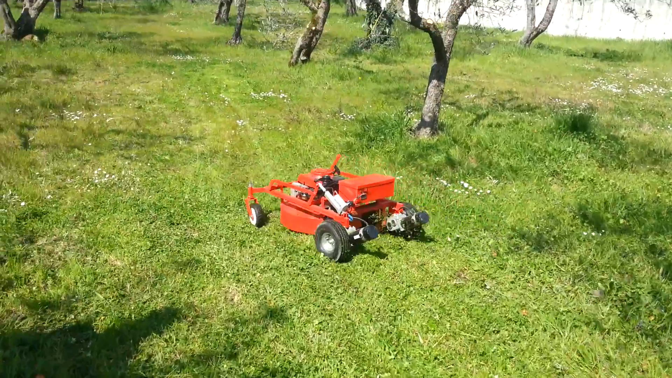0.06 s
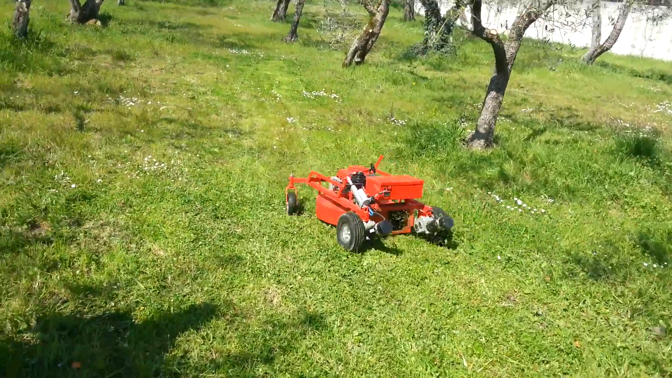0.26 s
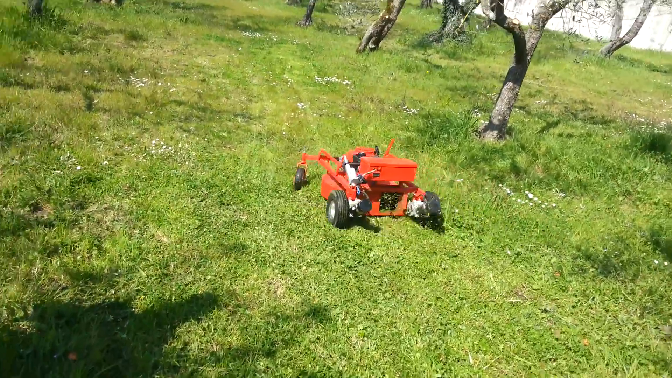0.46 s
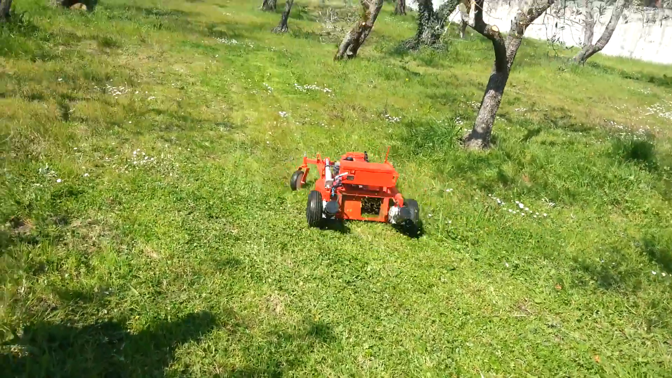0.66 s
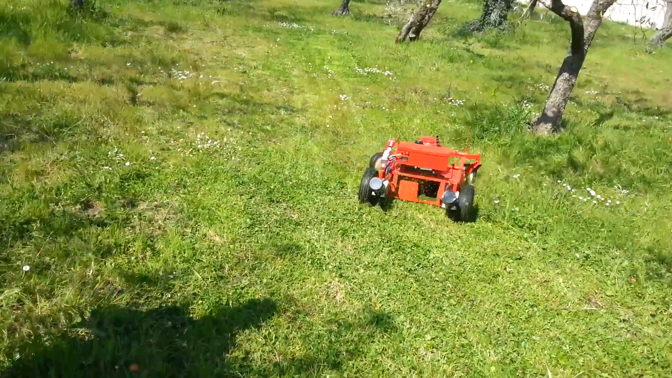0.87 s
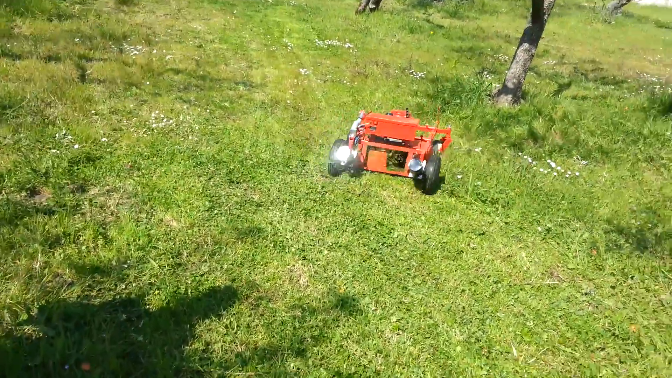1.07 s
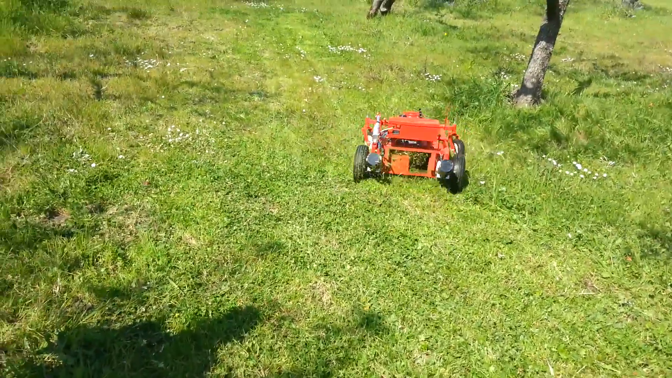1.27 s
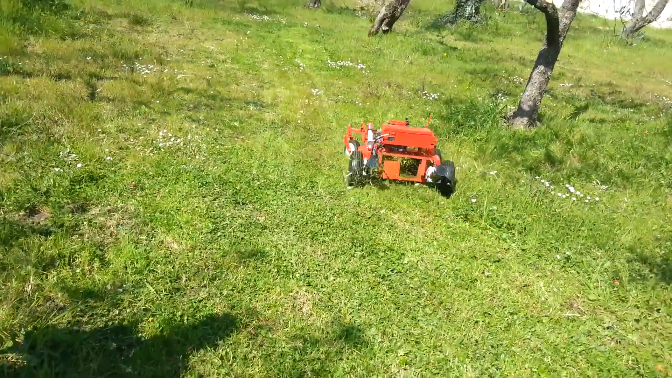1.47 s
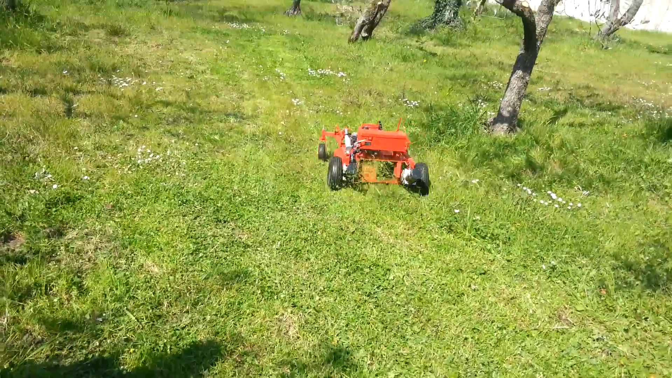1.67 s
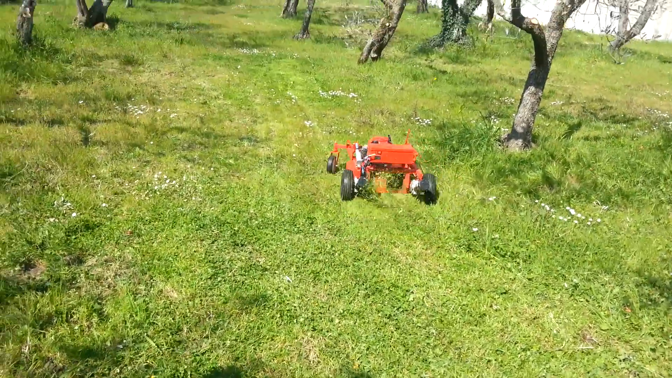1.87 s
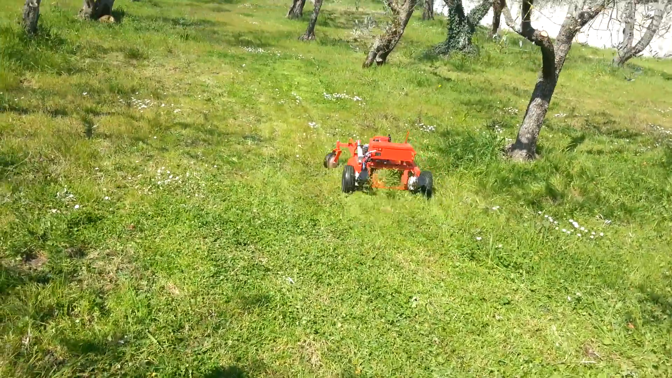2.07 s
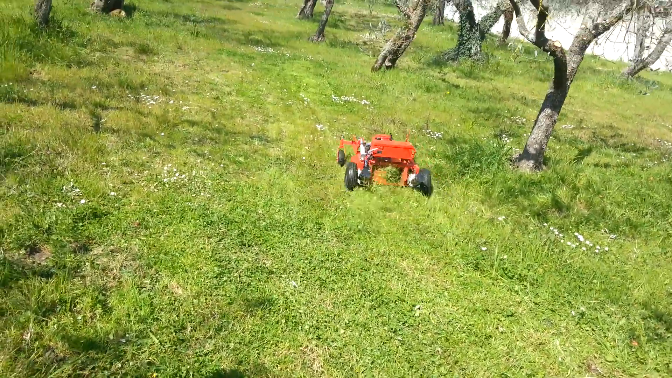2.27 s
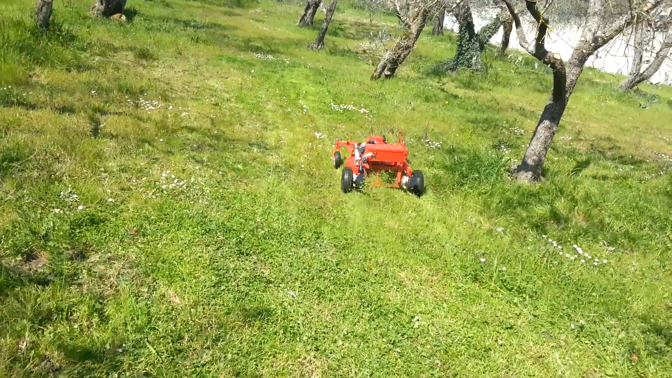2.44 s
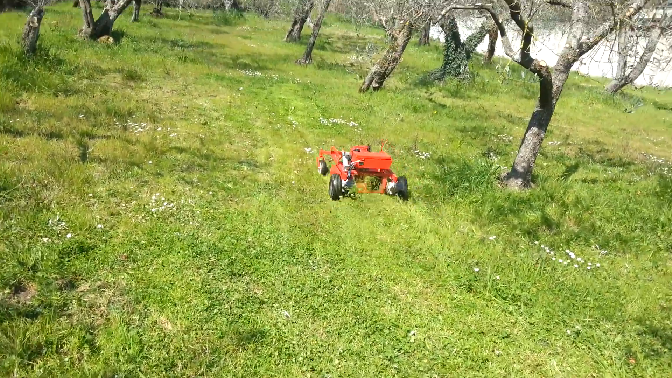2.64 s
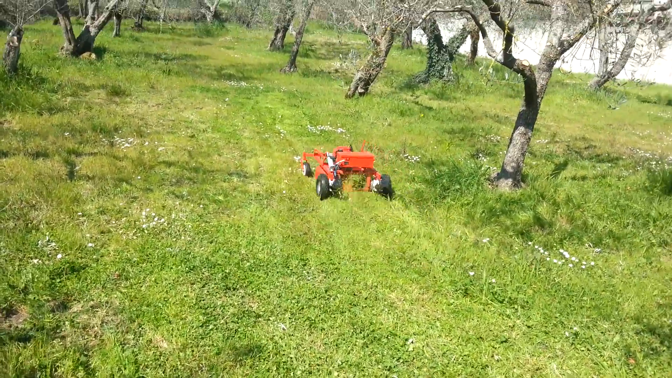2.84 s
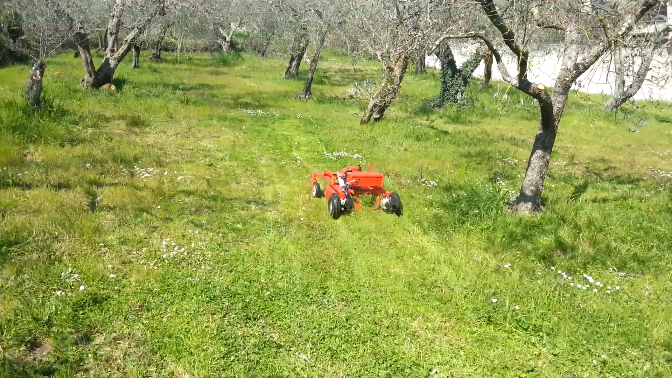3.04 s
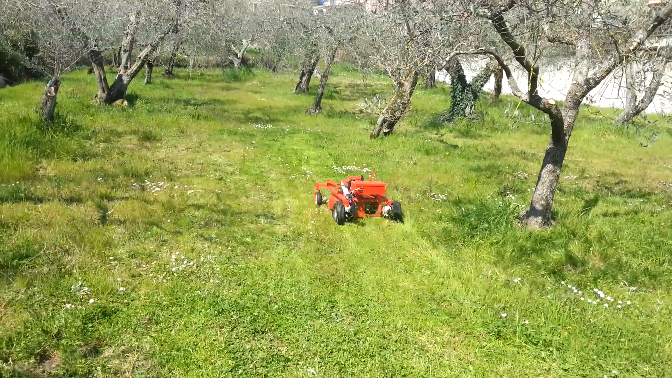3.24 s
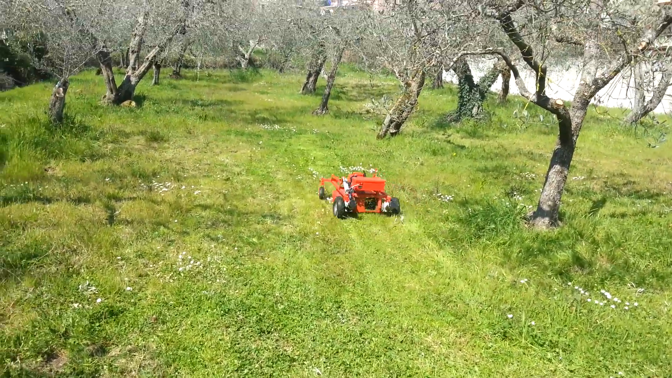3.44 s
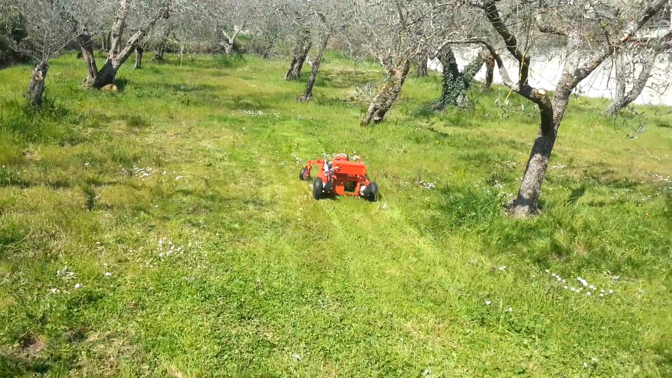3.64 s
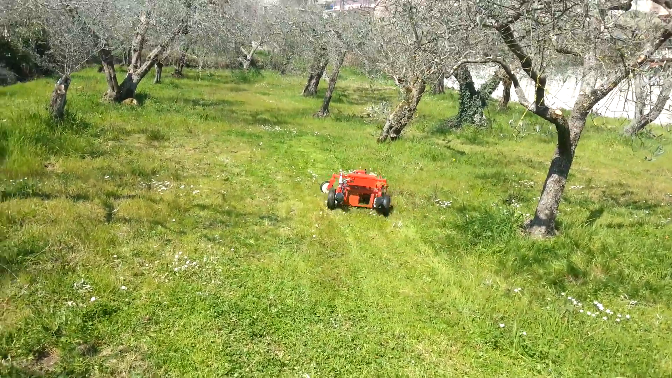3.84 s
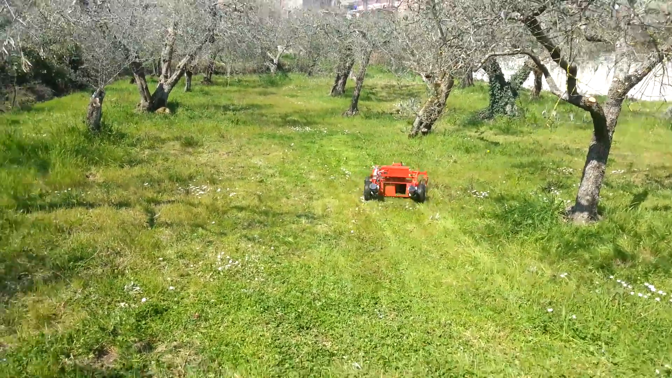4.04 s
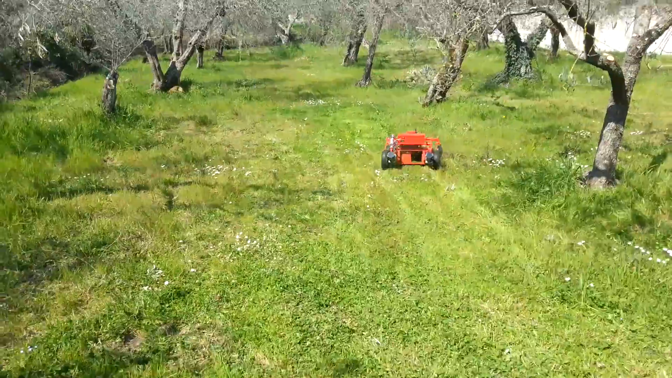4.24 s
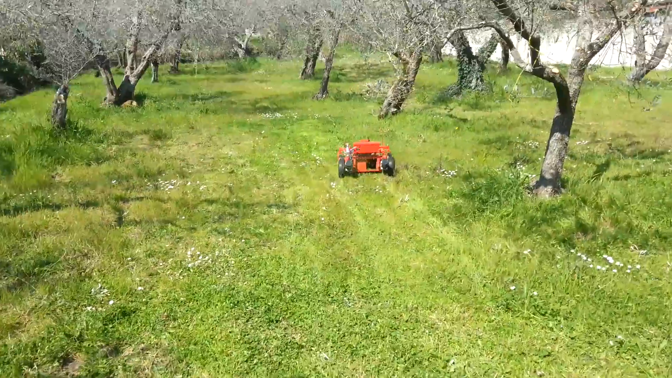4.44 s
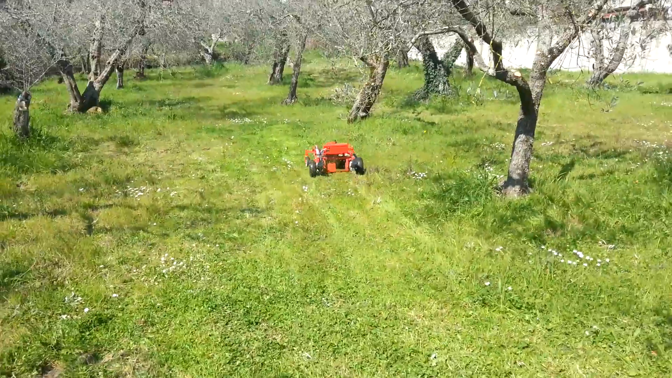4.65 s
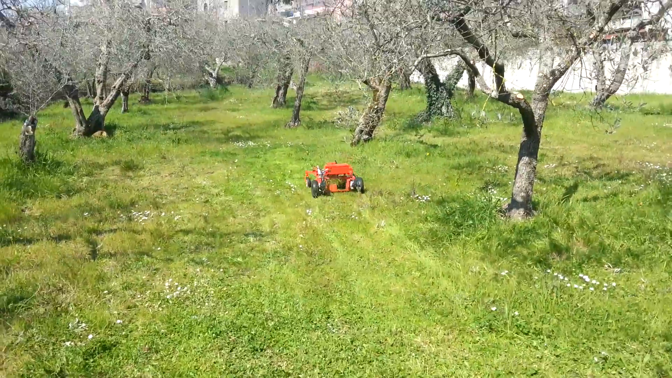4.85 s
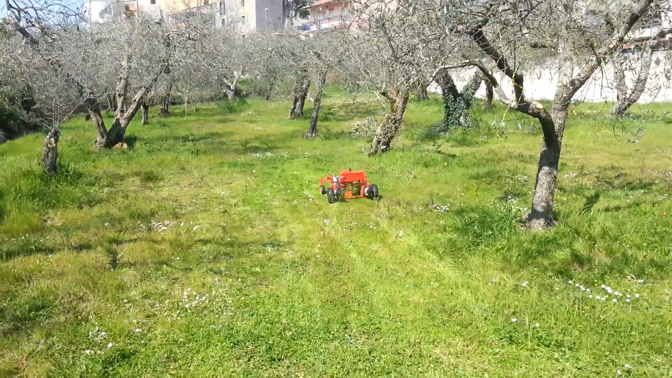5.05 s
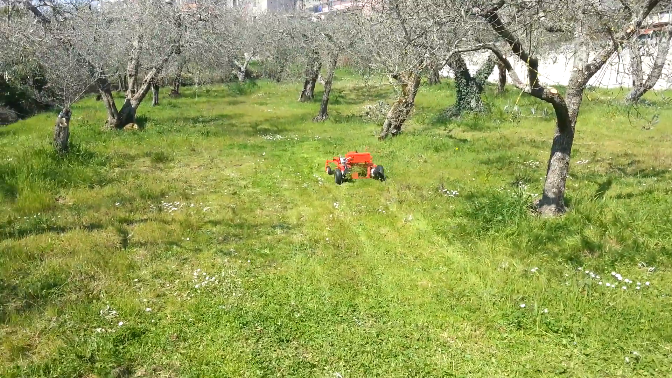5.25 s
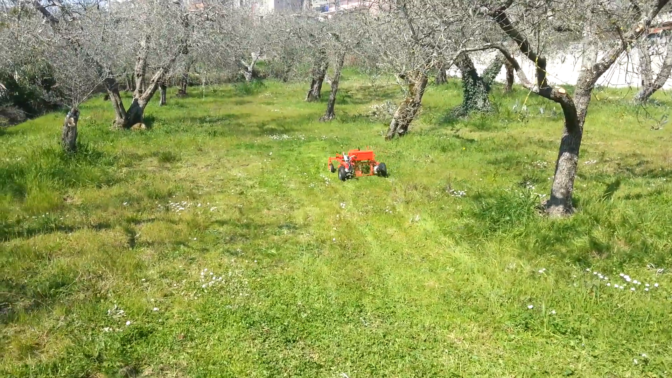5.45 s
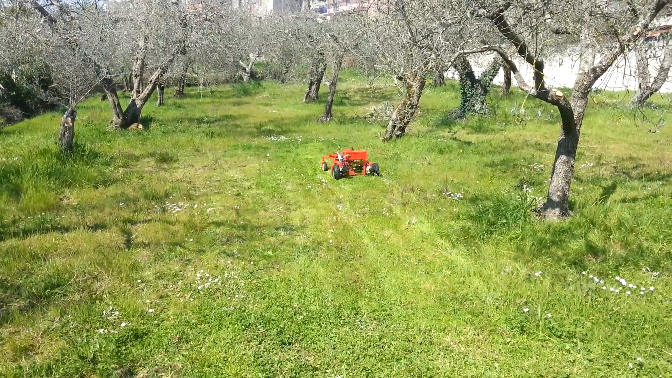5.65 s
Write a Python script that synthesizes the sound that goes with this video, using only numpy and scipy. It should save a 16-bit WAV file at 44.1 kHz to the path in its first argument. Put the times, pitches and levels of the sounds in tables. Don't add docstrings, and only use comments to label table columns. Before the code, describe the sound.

Outdoors, a remote-driven mower starts close, droning and clattering, its blades chopping thick stems with loud snaps and hollow clunks under the deck. It moves away and becomes quieter and smoother, with a faint metallic whine around two seconds. After four seconds the right side opens up brighter as a hand slides off the microphone; dry crackles and another burst of cutting follow. A light breeze is barely audible.

```python
import sys
import numpy as np
from scipy import signal
from scipy.fft import rfft, irfft, next_fast_len
from scipy.io import wavfile
from scipy.ndimage import uniform_filter1d, map_coordinates

SR = 44100
rng = np.random.default_rng(int(sys.argv[2]) if len(sys.argv) > 2 else 0)


def nominal_scale(level):
    x = np.asarray(level, float) / 20
    return 10 ** x


def file_out(sig):
    cols = np.atleast_2d(sig).T
    lim = np.clip(cols, -1, 1)
    pcm = np.round(lim * 32767).astype(np.int16)
    wavfile.write(sys.argv[1], SR, pcm)


N = 251799
T = np.arange(N) / SR

# time in s, ground echo delay in ms, echo strength 0-1, right port lag in ms.
PATH = [(0, 1.13, .35, 0), (.7, 1.13, .35, 0), (.85, 1.15, .3, .03), (1.4, 1.21, .3, .03),
        (1.55, 1.22, .4, -.01), (2.3, 1.25, .5, -.01), (2.8, 1.4, .55, 0), (3.6, 1.43, .55, 0),
        (4.0, 1.37, .5, .01), (4.2, 1.34, .4, .03), (4.45, 1.27, .25, 0), (5.71, 1.23, .3, 0)]


def evened(x):
    return x / np.sqrt(np.mean(x ** 2) + 1e-20)


def read(points, hz):
    f, value = np.transpose(points)
    return np.interp(np.log(hz + 1), np.log(f + 1), value)


def columns(rows, t):
    s, *values = np.transpose(rows)
    return [np.interp(t, s, v) for v in values]


def colour(x, points):
    size = next_fast_len(N)
    gain = nominal_scale(read(points, np.fft.rfftfreq(size, 1 / SR)))
    return evened(irfft(rfft(x, size) * gain, size)[..., :N])


def drift(hz):
    return colour(rng.standard_normal(N), [(hz, 0), (3 * hz, -30), (30 * hz, -120)])


def ring(x, hz, width_hz):
    return signal.lfilter(*signal.iirpeak(hz, hz / width_hz, SR), x)


def ring_twice(x, hz, width_hz, second_width_hz):
    return ring(ring(x, hz, width_hz), hz, second_width_hz)


def beat(cycle, depth, count, shift):
    return 1 + depth * np.cos(2 * np.pi * (count * cycle - shift))


def held_gain(start_s, length_s, attack_s, release_s):
    rise = np.clip((T - start_s) / attack_s, 0, 1)
    return rise * np.exp(-np.maximum(T - start_s - length_s, 0) / release_s)


def two_paths():
    return rng.standard_normal((2, N))


def grains(spread_db, per_s):
    size = nominal_scale(spread_db * np.minimum(rng.exponential(1, N), 4))
    return size * (rng.random(N) < per_s / SR) * two_paths()


def place(out, start_s, peak_db, sound):
    at = round(start_s * SR)
    out[:, at:at + sound.shape[1]] += nominal_scale(peak_db) * sound / abs(sound).max()


def wind():
    gusts = nominal_scale(3.5 * np.array([drift(hz=5), drift(hz=5)]))
    rumble = colour(two_paths(), [(12, -20), (30, -10), (60, -2), (110, 10), (300, -50)])
    return nominal_scale(-59.5) * gusts * rumble


def chaff():
    # start in s, peak in dB.
    husks = [(4.5718, -41), (4.6003, -31), (4.6123, -35), (4.6497, -36), (4.6606, -33), (4.6726, -30),
             (4.6871, -30), (4.712, -37), (4.7634, -34), (4.7739, -31), (4.8133, -41), (4.8133, -31),
             (4.8263, -27), (4.8642, -28), (4.8757, -30), (4.8901, -28), (4.9166, -28), (4.9879, -29),
             (4.9879, -29), (5.0049, -29), (5.0178, -25), (5.0303, -22), (5.0672, -26), (5.0807, -25)]
    out, t = np.zeros((2, N + 512)), np.arange(512) / SR
    for s, db in husks:
        snap = rng.standard_normal((2, 512)) * nominal_scale(-60 * t / .016)
        place(out, s, db + 4.5, ring_twice(snap, 13600., 3500., 3600.))
    return out[:, :N]


def ticks():
    # start in s, peak in dB.
    clicks = [(0.0423, -19), (0.0977, -24), (0.136, -7), (0.162, -12), (0.5232, -15), (0.617, -26),
              (0.827, -18), (0.8869, -28), (0.9183, -22), (0.9717, -13), (1.2535, -23), (1.2544, -22),
              (1.3977, -17), (1.5424, -24), (1.569, -15), (1.584, -14), (1.6606, -22), (1.714, -23),
              (1.7399, -22), (1.8422, -19), (1.9589, -25), (2.4249, -17), (2.6224, -26), (2.9617, -27),
              (3.0898, -36), (3.2445, -31), (3.3308, -36), (3.4685, -30), (3.6641, -30), (4.147, -26),
              (4.1734, -23), (4.19, -26), (4.2842, -32), (4.2911, -30), (4.3345, -36), (4.3859, -26),
              (4.4618, -37), (4.5151, -35), (4.5341, -33), (4.601, -30), (4.6122, -31), (4.6618, -31),
              (4.774, -21), (4.8628, -29), (4.9881, -24), (5.018, -19), (5.0305, -26), (5.0674, -25),
              (5.0933, -29), (5.1602, -27), (5.2824, -31), (5.3333, -24), (5.3592, -30), (5.5228, -34),
              (5.5822, -32), (5.6226, -32), (5.6875, -29)]
    out, t = np.zeros((2, N + 512)), np.arange(512) / SR
    for s, db in clicks:
        click = rng.standard_normal((2, 512)) * nominal_scale(-60 * t / .009)
        place(out, s, db + 2.5, ring(click, 12000., 9000.))
    return out[:, :N]


def panel():
    # time in s, level in dB.
    level = [
        (0, -52),
        (1.6, -46),
        (1.85, -42),
        (2.2, -37),
        (2.33, -48),
        (2.44, -41),
        (2.63, -39),
        (2.9, -42),
        (4.4, -50),
        (5.71, -55),
    ]
    tone = ring(ring(two_paths(), 1560., 30.), 1559., 32.)
    return nominal_scale(columns(level, T)[0]) * evened(tone)


def booms(cycle):
    # start in s, length in s, level in dB, pitch in Hz.
    clumps = [(0.2, 0.19, -27, 530), (0.53, 0.12, -26, 570), (0.614, 0.091, -33, 616),
              (0.924, 0.093, -24, 644), (0.976, 0.083, -26, 570), (1.344, 0.07, -27, 570),
              (1.49, 0.088, -28, 583), (1.5, .05, -33, 640), (1.824, 0.049, -34.5, 580),
              (2.42, 0.11, -41, 690), (1.9, 0.046, -41, 620), (0.044, 0.095, -25, 1170),
              (0.46, 0.08, -27, 1170), (0.032, 0.514, -28.5, 320), (5.073, 0.15, -39.5, 4600),
              (5.22, 0.22, -43.5, 4440), (1.327, 0.094, -30, 2730), (1.524, 0.051, -23, 2600),
              (1.38, .05, -32, 3200), (4.32, 0.16, -38.5, 3030), (2.72, .2, -40.5, 700),
              (1.72, .2, -33, 400), (5, .45, -50, 13500), (5.0, .2, -44, 5900), (5.2, 0.1, -48, 7200),
              (4.5, .08, -41, 7400), (6.4, 0.4, -43, 16000), (1.85, .88, -40.5, 1580),
              (2.95, .08, -46, 5500), (3.62, .06, -45, 5700), (2.6, .05, -44, 5900), (3.96, .05, -46, 5600),
              (0.916, 0.11, -30.5, 753), (5.0, 0.18, -38, 1290), (5.02, .18, -38, 1760),
              (1.01, 0.13, -39, 960), (2.1, .63, -34, 2350), (0.52, 0.25, -30, 1950),
              (0.022, 0.29, -30.5, 1670), (5.8, 0.18, -33, 1910), (5.07, 0.14, -36, 2310)]
    fade_s = 0.024
    out = np.zeros((2, N))
    tumble = two_paths() * beat(cycle, .3, count=4, shift=.3) * nominal_scale(1.2 * drift(hz=30.))
    for start_s, length_s, db, hz in clumps:
        held = held_gain(start_s, length_s, fade_s, fade_s)
        held = uniform_filter1d(held, round(min(.4 * length_s, .05) * SR))
        width_hz = 0.11 * hz * (1 + hz / 2500)
        out += nominal_scale(db) * held * evened(ring_twice(tumble, hz, width_hz, width_hz))
    return out


def strikes():
    # start in s, peak in dB, pitch in Hz.
    stems = [(0.0435, -9, 1590), (0.082, -13, 1750), (0.1337, -6, 2620), (0.146, -13, 2300),
             (0.157, -13, 2600), (0.249, -17, 2130), (0.454, -16, 2500), (0.566, -19, 1780),
             (0.6, -16, 1950), (0.887, -19, 2050), (0.974, -14, 2410), (0.9995, -24, 2430),
             (1.04, -16, 2710), (1.243, -7, 2680), (1.255, -3, 2470), (1.2796, -11, 2640),
             (1.301, -20, 2550), (1.5435, -3.5, 1810), (1.557, -13, 2400), (1.572, -13, 2600),
             (1.5842, -7, 2597), (1.844, -16, 1560), (2.146, -22, 2280), (2.2365, -22, 2250),
             (2.416, -19, 2220), (2.626, -16, 1580), (2.7021, -16, 2034), (4.993, -18, 3150),
             (5.0311, -12.5, 2260), (5.082, -21, 2080), (5.093, -12, 2280), (5.118, -14.5, 4280),
             (5.127, -19, 4400), (5.207, -17, 2300), (5.245, -24, 4500), (5.2826, -31, 2080),
             (5.309, -25, 4400), (5.333, -26, 4510), (5.3473, -22, 4830), (5.3602, -12, 4550),
             (5.436, -26, 2170), (5.521, -25, 2230), (5.6233, -23, 4470), (5.699, -14, 3000)]
    out, t = np.zeros((2, N + 1024)), np.arange(1024) / SR
    envelope = np.minimum(t / .0005, 1) * nominal_scale(-60 * t / .011)
    for s, db, hz in stems:
        burst = rng.standard_normal((2, 1024)) * envelope
        crack = ring_twice(burst, 5000., 6000., 7000.)
        deck_ring = ring_twice(burst, hz, 1700., 1700.)
        place(out, s, db + 1.5, crack + 5.5 * deck_ring)
    return out[:, :N]


def tufts():
    # start in s, length in s, shredding rise in dB, deck jolt in dB.
    caught = [(.0, 0.035, -2, 2.5), (0.095, 0.062, 3, 1), (0.244, 0.14, 0, 1), (0.47, 0.051, 2, 2.5),
              (0.575, 0.12, 2.5, 2), (0.882, 0.039, 6.5, 5.5), (0.962, 0.12, 1, 5),
              (1.242, 0.012, 10, -1.5), (1.346, 0.08, 5.5, 2), (1.495, 0.049, 2, 5), (1.538, 0.064, 7.5, 4),
              (1.614, 0.053, 4, 2), (1.726, 0.058, 3.5, 4.5), (1.832, 0.036, 6.5, 5.5),
              (1.953, 0.1, 3.5, 2.5), (2.145, 0.11, 5, 3.5), (2.42, 0.083, 6, 5.5), (2.616, 0.12, 5.5, 3.5),
              (2.845, 0.051, 3, -3), (3.15, .11, 1, 1.5), (3.437, 0.066, 4.5, 1), (3.786, 0.031, 5, -1),
              (4.166, 0.053, 5, 0), (4.524, 0.027, 4.5, 2), (4.987, 0.092, 4, 5), (5.074, .12, 5.5, 6),
              (5.347, 0.087, 3, 3.5), (5.505, 0.038, 2.5, 2), (5.613, 0.022, 2.5, -1.5),
              (5.677, .05, 3.5, 7)]
    start_s, length_s, *rises_db = np.transpose(caught)[..., None]
    shape = held_gain(start_s, length_s, attack_s=0.003, release_s=0.012)
    return [(db * shape).max(axis=0) for db in rises_db]


def shred(cycle, level_db, loss_db):
    # frequency in Hz, density in dB per Hz.
    spectrum = [(200, -32), (500, -25), (1100, -32), (2500, -20), (3200, -4.5), (5000, -12), (8300, -13.5),
                (12000, -17.5), (15000, -18.5)]
    tip_pass = np.exp(0.5 * (np.cos(2 * np.pi * (4 * cycle - .3)) - 1))
    sweep = 4.4 + tip_pass * nominal_scale(11.5 * np.tanh(drift(hz=24.7)))
    snaps = colour(sweep * grains(spread_db=-3.0, per_s=9000.), spectrum)
    fizz = ring(snaps, 13000., 5000.)
    fizz_gain = nominal_scale(1.8 * drift(hz=8.7) + 0.56 * loss_db + 1.5)
    return nominal_scale(level_db) * (snaps + fizz * (fizz_gain - 1))


def rattle(cycle, level_db):
    # mode in Hz, width in Hz, level in dB.
    casing = [(567, 41, -8), (1121, 115, 11), (1053, 45, 11), (1560, 40, 8), (1636, 154, 7.5),
              (1801, 180, 7.5), (2360, 910, 1.5), (2456, 160, -5), (2640, 100, -3), (3820, 520, 0),
              (4550, 120, -2), (5680, 330, -6.5)]
    push = beat(cycle, 0.6, count=3, shift=0.056) * beat(cycle, 0.09, count=4, shift=0.23)
    knocks = push * grains(spread_db=4.5, per_s=8000.)
    modes = sum(nominal_scale(db) * ring_twice(knocks, hz, width_hz, 0.68 * width_hz) for hz, width_hz, db in casing)
    return nominal_scale(level_db) * evened(modes)


def roar(cycle, level_db):
    # frequency in Hz, density in dB per Hz.
    spectrum = [(40, -41), (120, -23.5), (200, -8.5), (240, -5.5), (320, -1), (430, -3.5), (600, -4),
                (830, -8.5), (1050, -7), (1400, -11.5), (2300, -8.5), (3200, -17.5), (8000, -34.5),
                (15000, -51)]
    firing = beat(cycle, 0.094, count=1, shift=0.35) * beat(cycle, 0.071, count=2, shift=0.33)
    blades = beat(cycle, 0.13, count=4, shift=0.43)
    push = firing * blades * nominal_scale(drift(hz=36.8))
    return nominal_scale(level_db) * colour(push * two_paths(), spectrum)


def exhaust(cycle, level_db):
    # multiple of the firing rate, level in dB.
    orders = [(1, -47), (2, -43), (3, -39), (4, -28), (5, -19), (6, -15), (7, -19), (8, -14), (9, -9),
              (10, -7), (11, -18), (12, 0), (13, -13), (14, -10), (15, -10), (16, -8), (17, -11), (18, -12),
              (19, -15), (20, -14), (21, -18), (22, -18), (23, -20), (24, -13)]
    out = np.zeros(N)
    for k, db in orders:
        lag = .36 - .015 * k if k % 4 == 0 else .14 * k - .33
        sway = .0012 * k * drift(hz=5)
        waver_db = (.7 + .11 * k) * drift(hz=6)
        slope_db = -.5 * max(k - 12, 0) - 6 * max(4 - k, 0)
        out += nominal_scale(db + waver_db + slope_db) * np.cos(2 * np.pi * (k * cycle - lag - sway))
    return nominal_scale(level_db) * evened(out)


def ground_echo(deck):
    delay_ms, strength, _ = columns(PATH, T)
    at = np.arange(N) - delay_ms * SR / 1000
    echo = np.array([map_coordinates(path, [at], order=3) for path in deck])
    echo = signal.sosfilt(signal.butter(1, 3500., fs=SR, output="sos"), echo)
    return (deck + strength * echo) / np.sqrt(1 + strength ** 2)


def mower():
    # time in s, firing rate in Hz.
    speed = [(0.0, 19.56), (0.4, 19.5), (0.99, 19.7), (1.26, 19.66), (1.7, 19.28), (1.99, 19.3),
             (2.23, 19.23), (2.55, 19.31), (2.98, 19.23), (3.48, 19.63), (3.72, 19.69), (4.0, 19.66),
             (4.47, 19.86), (4.72, 19.77), (5.21, 19.39), (5.71, 19.42)]
    # time in s, distance in m, grass height in dB, rattle strength in dB.
    drive = [(0, 4.65, 3, 5.5), (.35, 4.5, 3, 1.5), (.65, 4.95, -3, 0.5), (.82, 5.5, -3.5, -5),
             (1.0, 5.57, 4, 0.5), (1.45, 6.2, 3, -0.5), (2.0, 6.96, 2.5, 0), (2.55, 8.3, 3, 3),
             (2.95, 9.2, 2, 4), (3.3, 9.2, -4, 1), (4.1, 10.7, -2, 1), (4.45, 10.7, -1.5, -3.5),
             (4.7, 12.2, 4.5, -1.5), (4.96, 13.8, 5.5, 0), (5.3, 10.8, 2.5, -4), (5.6, 10.9, 0, -29),
             (5.71, 12.5, 4, -11)]
    distance_m, grass_db, rattle_db = columns(drive, T)
    loss_db = -20 * np.log10(distance_m / 5.0)
    tuft_db, jolt_db = tufts()
    cycle = np.cumsum(columns(speed, T)[0]) / SR

    deck = roar(cycle, -21.5 + loss_db + 0.65 * jolt_db)
    deck = deck + shred(cycle, -31.5 + loss_db + grass_db + tuft_db, loss_db)
    deck = deck + rattle(cycle, -27 + loss_db + rattle_db + 0.73 * jolt_db)
    deck = deck + strikes() + booms(cycle) + panel()
    heard = ground_echo(deck) + exhaust(cycle, -27.5 + loss_db + 0.51 * jolt_db)

    turned_s = 2.0
    chute_share = .72 * np.clip(2 - 2 * T / turned_s, 0, 1)
    return heard - chute_share * ring(heard, 425, 95)


def ports(x):
    # time in s, right port uncovered 0-1, notch from the gap under the hand in Hz.
    hand = [
        (0, 0, 15500),
        (4.23, .1, 15500),
        (4.33, .52, 15400),
        (4.4, .62, 15000),
        (4.47, .69, 13000),
        (4.6, .82, 11800),
        (4.85, 1, 11200),
        (5.05, 1, 10700),
        (5.71, 1, 10300),
    ]
    # frequency in Hz, level in dB.
    tilt_on, tilt_off = [(100, 1.1), (700, 0.5), (1300, 5), (2100, 9), (3300, 3), (4500, -1), (6500, -1),
                         (10500, 0), (14000, 4)], [(100, 2.5), (700, -0.5), (1300, -2.5), (2100, 1), (3300, -5.5),
                                          (4500, -6.5), (6500, -9), (10500, -5.5), (14000, -5)]
    # frequency in Hz, lag in rad.
    lead_on, lead_off = [(200, 0), (1500, .45), (2600, -.5), (3500, -1.3), (4300, -5.9), (5500, -5.2),
                         (8000, -6)], [(200, 0), (1500, .3), (2300, -1), (3500, -1.5), (4300, -5.8),
                                          (6500, -5.8), (8000, -8)]
    # frequency in Hz, share 0-1.
    same_on, same_off = [(60, .92), (150, .985), (300, .955), (500, .95), (1300, .88), (2500, .85),
                         (3300, .65), (3900, .3), (4600, .55), (6500, .5), (9000, .3)], [(60, .92), (150, .985), (300, .96), (500, .96), (1300, .9),
                                          (2500, .85), (3600, .7), (6500, .65), (9000, .4)]

    hz, t, (left, other) = signal.stft(x, SR, nperseg=512, noverlap=384)
    rows_hz = hz[:, None]

    def bump(centre_hz, width_hz):
        return np.exp(-((rows_hz - centre_hz) / width_hz) ** 2)

    bare, notch_hz = columns(hand, t)
    cupped = 4 * bare * (1 - bare)
    off = np.clip(8 * bare - 7 * np.clip(rows_hz / 7000, 0, 1), 0, 1)

    def blend(on, free):
        return read(on, hz)[:, None] * (1 - off) + read(free, hz)[:, None] * off

    same = np.clip(blend(same_on, same_off), 0, 1)
    lag = blend(lead_on, lead_off) + 2 * np.pi * np.outer(hz, columns(PATH, t)[2] / 1000)
    right = same * np.exp(-1j * lag) * left + np.sqrt(1 - same ** 2) * other
    notch_db = -20 * bare ** 2 * bump(notch_hz, 900)
    cup_db = 0.5 * cupped * off * bump(2600, 1500)
    right = right * nominal_scale(cup_db + notch_db - blend(tilt_on, tilt_off))
    left = left * nominal_scale(-12 * bump(8300, 450))

    pair = np.array([left, right]) * nominal_scale(read(tilt_on, hz) / 2)[:, None]
    pair = pair * nominal_scale(5.3 * off * (1 - cupped) ** 2 * bump(4650, 600))
    return signal.istft(pair, SR, nperseg=512, noverlap=384)[1][:, :N]


def scene():
    return ports(mower()) + wind() + ticks() + chaff()


def roll_off(x):
    return signal.sosfilt(signal.butter(12, 15700, fs=SR, output="sos"), x)


def record(dry):
    limited = .95 * np.tanh(dry / .95)
    edge = signal.firwin(401, 14600, window=("kaiser", 8), fs=SR)
    return roll_off(signal.oaconvolve(limited, edge[None], "same"))


dry = scene()
out = record(dry)
file_out(out)
```